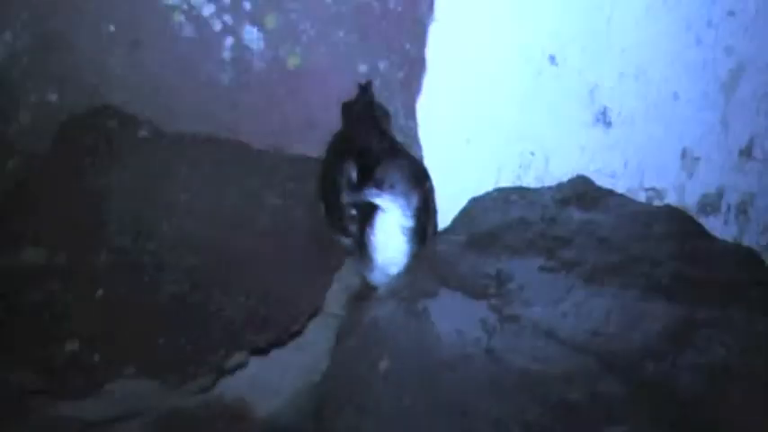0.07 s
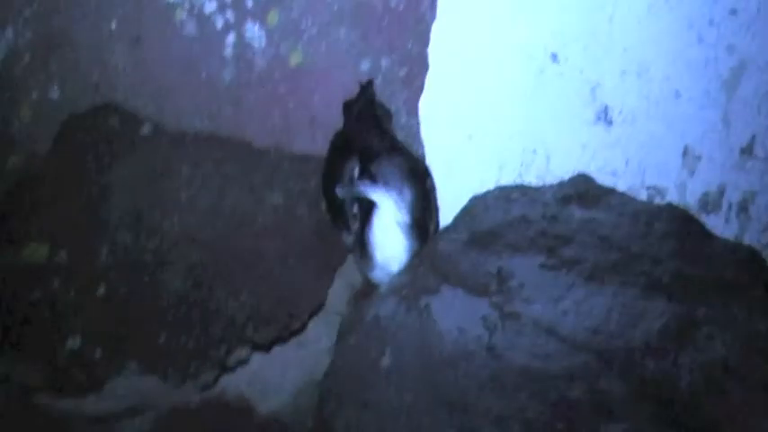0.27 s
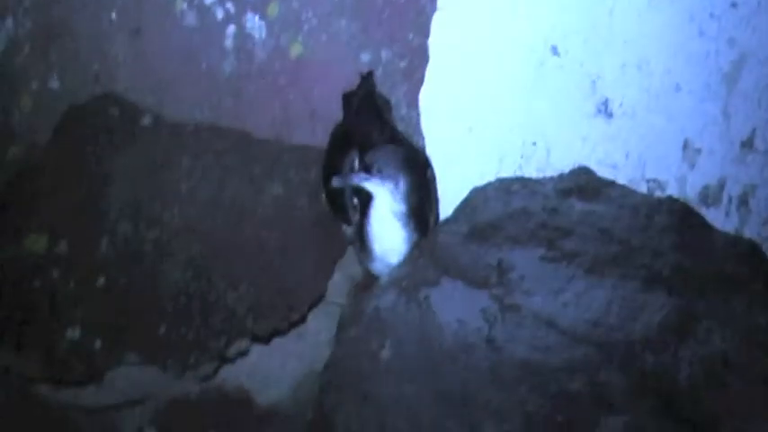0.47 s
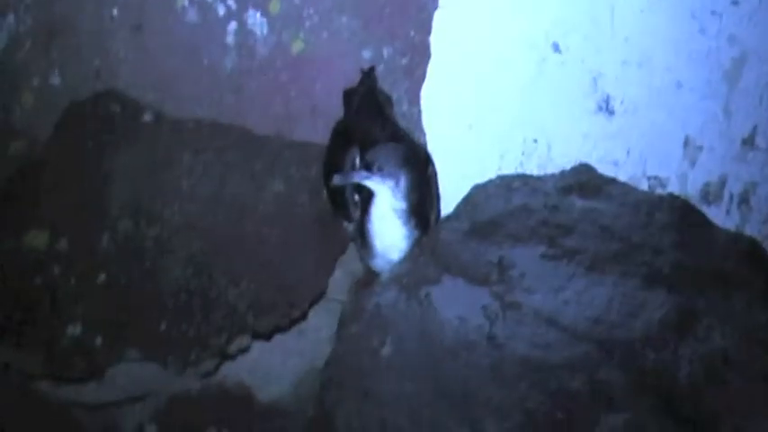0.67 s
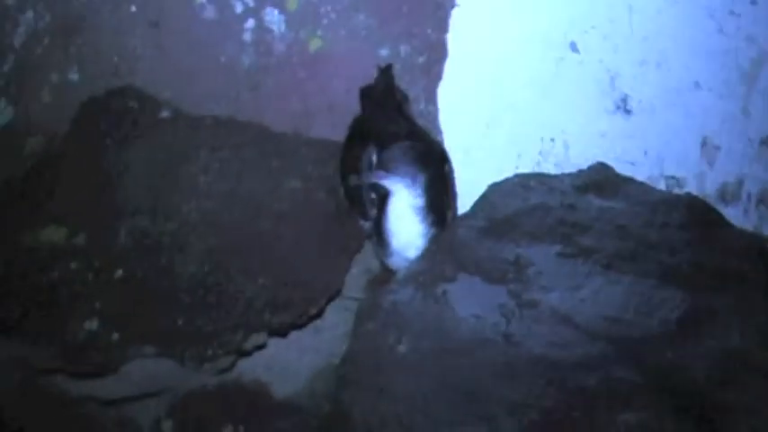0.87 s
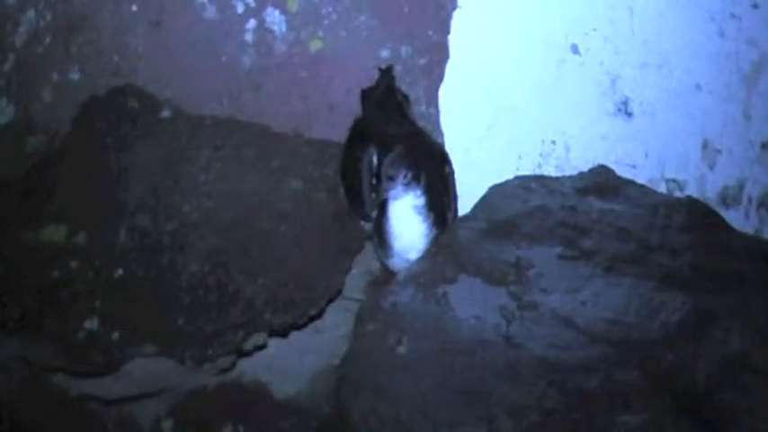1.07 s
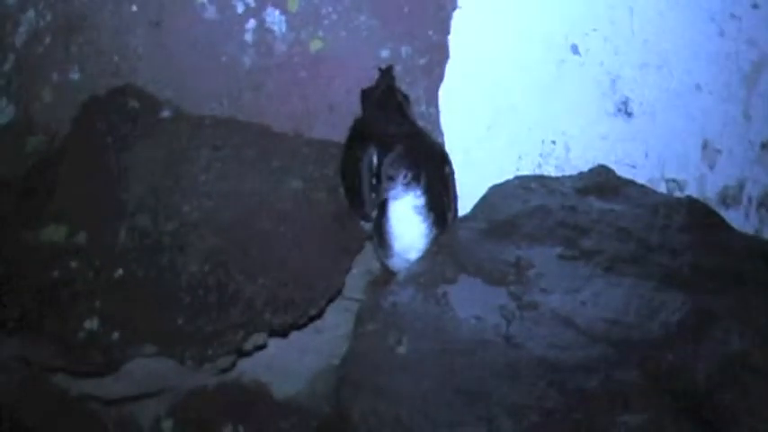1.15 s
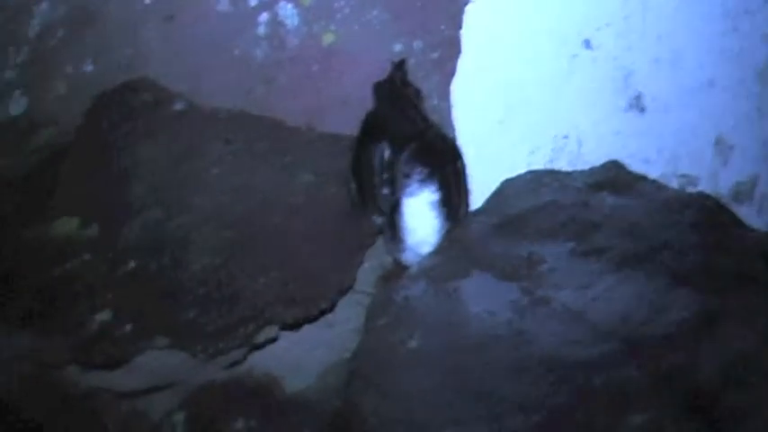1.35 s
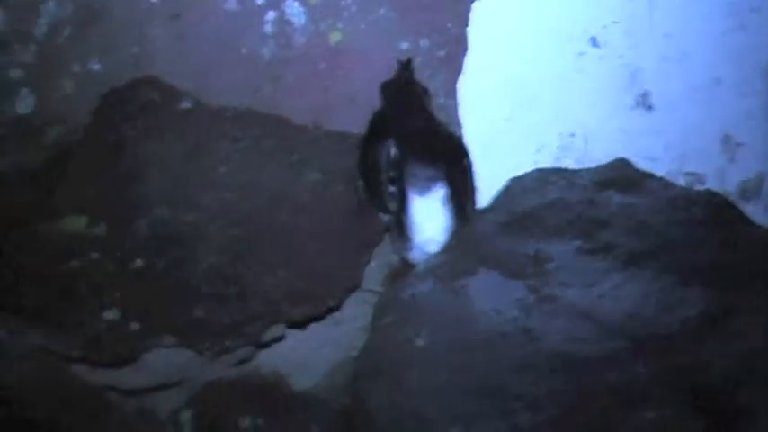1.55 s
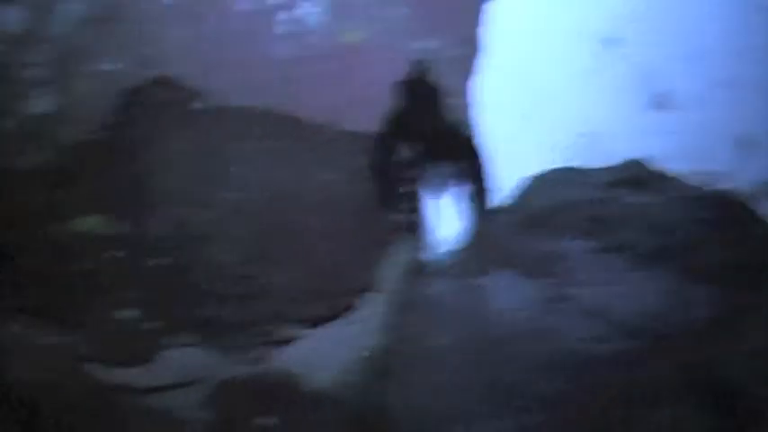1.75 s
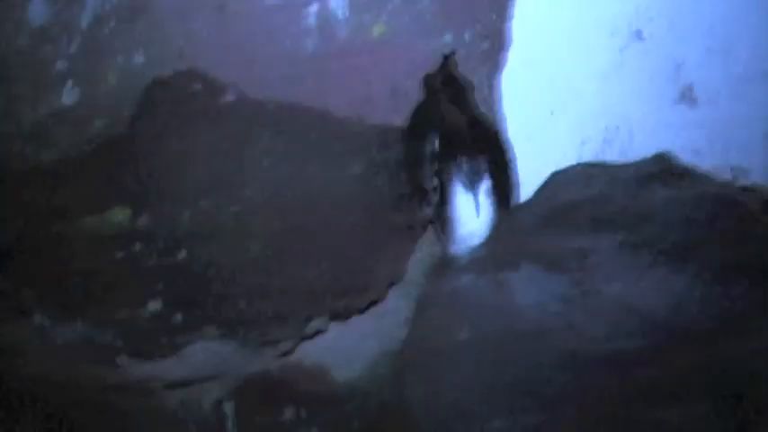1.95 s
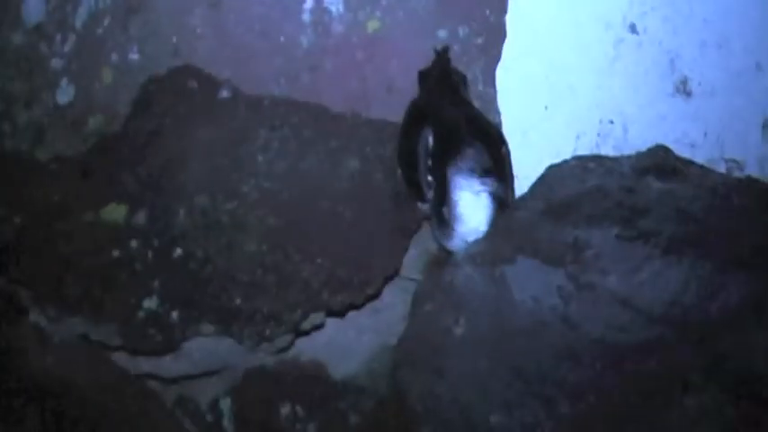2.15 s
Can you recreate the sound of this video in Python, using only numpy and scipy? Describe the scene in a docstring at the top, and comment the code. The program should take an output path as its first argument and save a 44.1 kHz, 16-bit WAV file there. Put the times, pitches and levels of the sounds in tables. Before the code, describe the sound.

Seabird colony at night calling in a harsh overlapping din, with one loud sharp plastic click

```python
"""A seabird colony at night on open rock: a wall of harsh overlapping calls, summed from hoarse overtone stacks over a
noise wash, with thin whistles (gliding sine tones) standing out and faint night air (coloured noise) behind.
The hand-held camera's plastic shell snaps once loudly and ticks: damped modes, a noise crack and a rattle.
Fingers thud on it (low damped modes) and a sleeve rustles against it (strokes of coloured noise)."""
import sys
import numpy as np
from scipy import signal
from scipy.fft import rfft, irfft, next_fast_len
from scipy.io import wavfile
from scipy.ndimage import uniform_filter1d, map_coordinates

SR = 44100
rng = np.random.default_rng(int(sys.argv[2]) if len(sys.argv) > 2 else 0)


def waveform_to_disk(signal):
    """Save audio, clipped to [-1, 1], as 16-bit WAV at the path in sys.argv[1]."""
    frames = np.transpose(np.atleast_2d(signal))
    scaled = np.clip(frames, -1, 1) * 32767
    samples = np.round(scaled).astype(np.int16)
    wavfile.write(sys.argv[1], SR, samples)


N = 97020  # 2.2 s

# Correlation between left and right in a diffuse field: (frequency [Hz], correlation coefficient)
CORRELATION = [(60, 0.057), (380, 0.59), (2380, 0.39), (15000, 0.56)]


def amp(db):
    """Decibels to an amplitude ratio: 20 dB is a factor of ten."""
    return 10 ** (np.asarray(db) / 20)


def unit(x):
    """Normalise the root-mean-square value to 1."""
    return x / np.sqrt(np.mean(x ** 2) + 1e-20)


def along(points, hz):
    """Interpolate (frequency, value) points on a logarithmic frequency axis, as pitch is heard."""
    f, v = np.transpose(points)
    return np.interp(np.log(hz + 1), np.log(f + 1), v)


def level(rows):
    """Envelope linear in decibels between (time, level) rows; silent outside, but held if it reaches the end."""
    s, db = np.transpose(rows)
    after_db = db[-1] if s[-1] > N / SR - .05 else -200
    return amp(np.interp(np.arange(N) / SR, s, db, left=-200, right=after_db))


def wobble(rate, size=N):
    """Slow random modulation: a smooth spline through `rate` random knots a second."""
    knots = rng.standard_normal(int(size * rate / SR) + 4)
    return map_coordinates(knots, [np.arange(size) * rate / SR])


def filtered(x, response):
    """Linear filtering: the spectrum is multiplied by a response of frequency."""
    m = next_fast_len(N + SR // 2)
    return irfft(rfft(x, m) * response(np.fft.rfftfreq(m, 1 / SR)), m)[..., :N]


def pan(db):
    """Interaural level difference: left exceeds right by db."""
    return amp([[db / 2], [-db / 2]])


def add(out, s, sound):
    """Superposition: mix a stereo sound in at time s [s]."""
    part = out[:, round(s * SR):][:, :sound.shape[1]]
    part += sound[:, :part.shape[1]]


def spread(pair, spectrum, correlation):
    """Diffuse field: unrelated mid and side signals, weighted by frequency to set the left-right correlation."""
    def mid_side_gain(hz):
        angle = np.arccos(np.clip(along(correlation, hz), -1, 1)) / 2
        return amp(along(spectrum, hz)) * [np.cos(angle), np.sin(angle)]
    mid, side = filtered(pair, mid_side_gain)
    return unit(np.array([mid + side, mid - side]))


def patchy(patchy_db):
    """Non-stationary noise: two noises share time-frequency patches of random gain."""
    z = signal.stft(rng.standard_normal((2, N)), nperseg=512)[2]
    across_hz = uniform_filter1d(rng.standard_normal(z.shape[1:]), 4, 0)
    field = uniform_filter1d(across_hz, 8, 1)
    return unit(signal.istft(z * amp(patchy_db * unit(field)), nperseg=512)[1][:, :N])


def call(length, pitch_hz, hoarse, order=11):
    """Harmonic voice: overtones on an arched pitch, roughened by random frequency and amplitude modulation."""
    arch = .1  # rise of the pitch in mid-call, as a fraction
    u = np.linspace(0, 1, round(length * SR))
    jitter = 0.0319 * hoarse * wobble(90.7, size=len(u))
    hz = pitch_hz * (1 + arch * np.sin(np.pi * u) ** .5 + jitter)
    gains = amp(rng.normal(0, 2.5, (order, 1)))
    numbers = np.arange(1, order + 1)[:, None]
    phases = numbers * np.cumsum(2 * np.pi * hz / SR) + rng.uniform(0, 6.55, (order, 1))
    voice = (gains * np.sin(phases)).sum(0)
    roughness = 1 + hoarse * wobble(199.7, size=len(u))
    return unit(voice * roughness) * np.sin(np.pi * u) ** .5


def colony(count=260):
    """Incoherent superposition: hoarse calls from all around merge with a noise wash of the farthest birds."""
    # Spectrum of the chorus, also the filter on the side calls: (frequency [Hz], relative level [dB])
    chorus_spectrum = [(88, -47.5), (150, -12), (281, -13.5), (477, -8.5), (608, -7.5), (1100, 0.5),
                       (1540, -7), (3200, -25), (7000, -35), (10000, -67)]
    # Calls off to the side: (time [s], length [s], pitch before the arch [Hz], level before filtering [dB])
    side_calls = [(1.419, 0.316, 340, -50)]
    median_hz, pitch_spread = 429.3, .2  # spreads are in natural-log units
    median_s, length_spread = 0.0696, 0.416
    size_db, hoarse = 2.5, 0.819  # standard deviation of call level; roughness
    chorus_db, wash_db = -48, 4.5  # mean level; wash over the separate calls
    lead_s = .2  # cut off the front, so that calls are already under way at the start

    calls, aside = np.zeros((2, N + SR)), np.zeros((2, N))
    for k, (pitch, length, size, place) in enumerate(rng.standard_normal((count, 4))):
        length_s = median_s * np.exp(length_spread * length)
        pitch_hz = median_hz * np.exp(pitch_spread * pitch)
        voice = call(length_s, pitch_hz, hoarse) * amp(size_db * size)
        direction = [[np.cos(3 * place)], [np.sin(3 * place)]]
        add(calls, k / count * (N / SR + lead_s), voice * direction)
    for s, length_s, pitch_hz, db in side_calls:
        clearer = call(length_s, pitch_hz, hoarse=0.58, order=2)
        add(aside, s, amp(db) * clearer * [[1], [-.6]])

    pair = unit(calls[:, round(lead_s * SR):][:, :N]) + amp(wash_db) * patchy(patchy_db=1.0)
    swell = amp(chorus_db + 0.59 * wobble(2.62))
    chorus = swell * spread(pair, chorus_spectrum, CORRELATION)
    # distance dulls the side calls
    return chorus + filtered(aside, lambda hz: amp(along(chorus_spectrum, hz)))


def night_air():
    """Broadband noise: a patchy random signal with a shaped spectrum makes a diffuse background."""
    # Spectrum of the air: (frequency [Hz], relative level [dB])
    air_spectrum = [(20, -27), (55, -14.5), (263, -16), (1100, -8.5), (2110, -38), (4490, -23),
                    (5280, -32.5), (16000, -41.5)]
    return amp(-55) * spread(patchy(patchy_db=2.0), air_spectrum, CORRELATION)


def whistles():
    """Frequency modulation: a single sine leaps towards its top, sags and fades, wavering in pitch and level."""
    # One whistle a row, before waver and fade:
    # (time [s], length [s], first frequency [Hz], top frequency [Hz], last frequency [Hz], level [dB])
    whistle_rows = [(.094, 0.044, 2510, 2887, 2476, -57), (0.157, 0.13, 2260, 3070, 2700, -54.5),
                    (0.346, 0.092, 2460, 2860, 2600, -59), (0.609, 0.031, 1600, 1660, 1630, -50.5),
                    (.652, 0.034, 2440, 2900, 2480, -53), (0.714, 0.135, 2200, 3120, 2600, -53.5),
                    (0.778, .035, 1860, 1924, 1880, -48), (0.091, 0.097, 4160, 4270, 4250, -65),
                    (1.21, 0.06, 1840, 2037, 1720, -57.5), (1.249, 0.072, 2860, 2880, 2580, -50.5),
                    (1.26, 0.262, 1774, 1720, 1873, -57), (1.294, 0.076, 3070, 3100, 2770, -64.5),
                    (1.487, 0.038, 1733, 2186, 2210, -51.5), (1.672, 0.064, 2350, 2510, 2160, -60.5),
                    (1.709, 0.075, 1870, 2070, 1980, -60), (1.722, 0.12, 2390, 3190, 2620, -62.5),
                    (1.818, 0.092, 2530, 3160, 2700, -58.5), (1.957, 0.057, 3960, 4280, 4270, -60),
                    (1.984, 0.025, 1070, 1090, 1060, -43), (2.139, 0.041, 1125, 1079, 1035, -43.5)]
    leap_s, sag = .007, 2.6  # time constant of the leap; exponent, higher sags later
    edge_s, fade_db = .006, 4  # ramps at both ends; loss by the end
    waver, waver_db = .004, 2.4  # pitch waver as a fraction; level waver

    out = np.zeros((2, N))
    for s, length, first_hz, top_hz, last_hz, db in whistle_rows:
        t = np.arange(round(length * SR)) / SR
        below_top = (top_hz - first_hz) * np.exp(-t / leap_s)
        sagged = (top_hz - last_hz) * (t / length) ** sag
        hz = (top_hz - below_top - sagged) * (1 + waver * wobble(185, size=len(t)))
        edges = np.clip(np.minimum(t, length - t) / edge_s, 0, 1)
        level_db = db - fade_db * (t / length) ** 2 + waver_db * wobble(104, size=len(t))
        phase = np.cumsum(2 * np.pi * hz / SR) + rng.normal(0, 0.32, (2, 1))
        add(out, s, edges * amp(level_db) * np.sin(phase))
    return out


def ring(modes, t, tilt_db):
    """Modal vibration: damped sines in two-stage decay, their levels scattered anew at each strike."""
    linger, linger_db = 5, -14.5  # second decay: times longer, and its level
    lag_rad, lag_shrink_rad = 4.7, .22  # higher modes lag in phase, by a step that shrinks upward
    total = 0
    for k, (hz, db, t60) in enumerate(modes):
        gain = amp(db + tilt_db * np.log2(hz / 2500) + rng.normal(0, 1.5))
        decay = amp(-60 * t / t60) + amp(linger_db - 60 * t / (linger * t60))
        lag = k * (lag_rad - k * lag_shrink_rad)
        total = total + gain * decay * np.sin(2 * np.pi * hz * t - lag)
    return total


def shell():
    """Impulsive excitation: each snap or tick rings the shell's modes, cracks in the treble and leaves a rattle."""
    # Snaps and ticks: (time [s], ring level [dB], tilt of the ring, also moving the crack's top [dB per octave],
    # crack level [dB], left over right [dB])
    ticks = [(0.2229, -26.5, -1.5, -38, -9.5), (.2281, -18.5, 6.4, -8, -5), (.2305, -21.5, 0, -12, -4.5),
             (0.2348, -29, -6, -37, -11), (0.657, -55.5, -2, -48, 5), (0.7646, -36, -5, -33, -4),
             (0.8025, -63, 1, -43, 0), (0.8233, -48, -4, -30.5, -1), (0.8569, -60, 5, -39, 1.1),
             (0.894, -66, -1, -39, 1), (0.8993, -52, 3, -30.5, -1), (1.0885, -45.5, -8, -27.5, 2.5),
             (1.2555, -54, -6, -40, 7), (1.3026, -70, -2, -41.5, 3), (1.3643, -61, -1.5, -39.5, -1),
             (1.5182, -57, 0, -34.5, -4)]
    # Modes of the plastic shell: (frequency [Hz], relative level [dB], t60 of the first decay [s])
    shell_modes = [(637, -10, 0.014), (1052, -7, 0.024), (1510, -0.5, 0.01), (1967, -2, 0.016),
                   (2402, 3.5, 0.01), (2760, 7, 0.011), (3310, -7.5, 0.016), (3720, 0.5, 0.0089),
                   (4110, 1.5, 0.011), (4790, -4.5, 0.018), (5626, -7, 0.014)]
    blow_s = .0005  # time constant of the rise
    crack_s, crack_top_hz = .005, 10900  # t60; upper band edge without tilt
    crackle_s, crackle_db = 0.046, -22  # ragged after-crackle: t60; level under the crack
    rattle_s, rattle_db = 0.068, -14  # t60; level under the ring before the filter
    rattle_hz, rattle_width_hz = 3140, 2600

    out, rattle, t = np.zeros((2, N)), np.zeros((2, N)), np.arange(SR // 8) / SR
    rise = 1 - np.exp(-t / blow_s)
    for s, ring_db, tilt_db, crack_db, side_db in ticks:
        near, apart, sharp, sharp_apart = rng.standard_normal((4, len(t)))
        ragged_db = 2.7 * wobble(722, size=len(t))
        fade = amp(-60 * t / crack_s) + amp(crackle_db - 60 * t / crackle_s + ragged_db)
        top_hz = np.clip(crack_top_hz * amp(tilt_db / 2), 5000, 20000)
        band = signal.butter(2, [3500, top_hz], 'band', fs=SR)
        crack_noise = sharp + 0.64 * sharp_apart * [[1], [-1]]
        crack = signal.lfilter(*band, amp(crack_db) * fade * rise * crack_noise)
        add(out, s, crack * pan(side_db))
        add(out, s, amp(ring_db) * ring(shell_modes, t, tilt_db) * rise * pan(side_db))
        rattle_noise = near + 0.48 * apart * [[1], [-1]]
        add(rattle, s, amp(ring_db + rattle_db - 60 * t / rattle_s) * rattle_noise * pan(side_db))

    def resonance(f):
        damping = 1j * f * rattle_width_hz
        return damping / (rattle_hz ** 2 - f * f + damping)
    return out + filtered(rattle, lambda f: 4 * resonance(f) ** 2)


def thuds():
    """Low-frequency modal response: a finger's blow excites damped sines, out of phase between left and right."""
    # Finger blows: (time [s], level [dB])
    blows = [(0.227, -26.5), (1.088, -40)]
    # Modes of a thud: (frequency [Hz], relative level [dB], t60 [s], phase by which left leads [rad])
    thud_modes = [(77.4, -12, 0.097, 1.83), (176, -3.5, 0.054, 2.21), (498, 11, 0.041, 2.68)]
    out, t = np.zeros((2, N)), np.arange(SR // 8) / SR
    rise = np.minimum(t / 0.0036, 1)
    for s, db in blows:
        for hz, mode_db, t60, lead in thud_modes:
            phase = 2 * np.pi * hz * t + [[lead / 2], [-lead / 2]]
            add(out, s, rise * amp(db + mode_db - 60 * t / t60) * np.sin(phase))
    return out


def sleeve():
    """Friction noise: each stroke of cloth is patchy noise with its own spectrum and envelope."""
    # Envelope of each stroke, before a flutter: (time [s], level [dB])
    strokes = [
        [(.76, -69), (.92, -59.5), (.96, -63.5), (1.12, -57.5), (1.145, -64)],
        [(.95, -78), (1.06, -59), (1.125, -57), (1.145, -72)],
        [(1.97, -75), (2.0, -53.5), (2.05, -50), (2.11, -54), (2.2, -49.5)],
    ]
    # Spectrum of each stroke: (frequency [Hz], relative level [dB])
    stroke_spectra = ([(900, -28), (3000, -1), (15000, -23)], [(8000, -16), (9800, 3.5), (11500, -10),
                      (12800, -16), (15000, -4)], [(1200, -0.5), (4200, -2), (7000, -9), (8300, -4),
                      (10000, -12), (12200, -5.5), (16000, -19)])
    out = np.zeros((2, N))
    for rows, spectrum in zip(strokes, stroke_spectra):
        flutter = amp(1.5 * wobble(39.87))
        cloth = spread(patchy(patchy_db=-0.5), spectrum, [(1000, 0.47)])  # same correlation at every frequency
        out += level(rows) * flutter * cloth
    return out


def scene():
    """Linear superposition of birds, night air and camera noises."""
    return colony() + night_air() + whistles() + shell() + thuds() + sleeve()


def record(dry):
    """Soft saturation compresses the loudest peaks; a low-pass then removes all above the band limit."""
    overload, top_hz = .8, 15960  # saturation amplitude; band limit
    soft = dry / (1 + (dry / overload) ** 4) ** (1 / 4)
    return filtered(soft, lambda hz: np.clip((top_hz - hz) / 500, 0, 1) ** .5)


dry = scene()
out = record(dry)
waveform_to_disk(out)
```